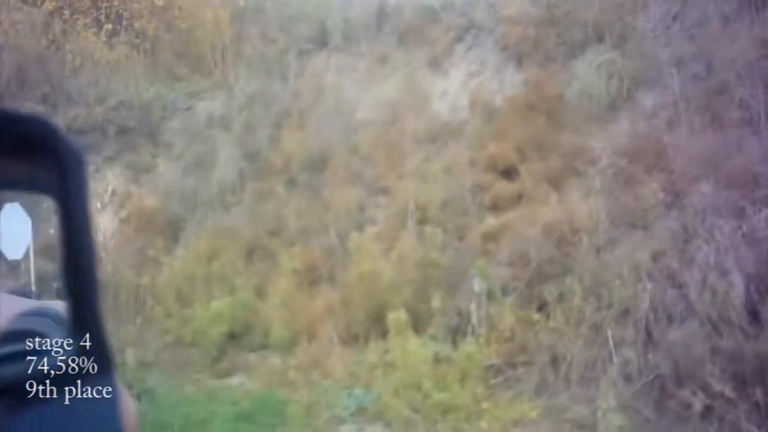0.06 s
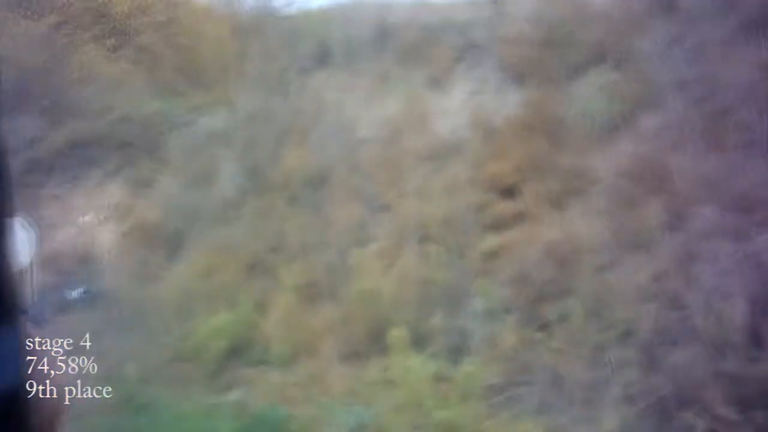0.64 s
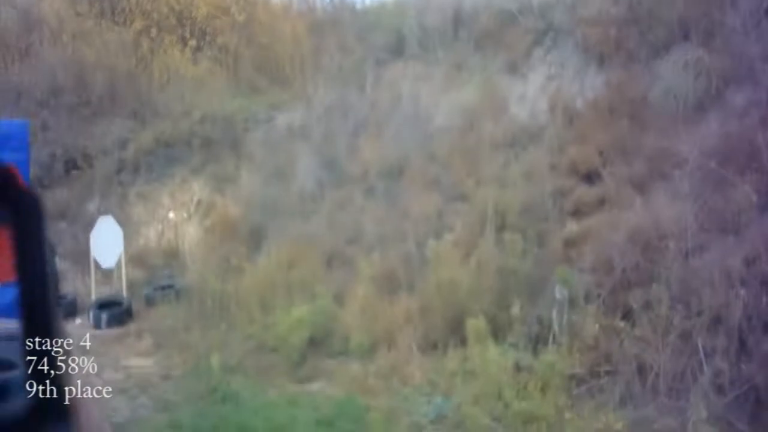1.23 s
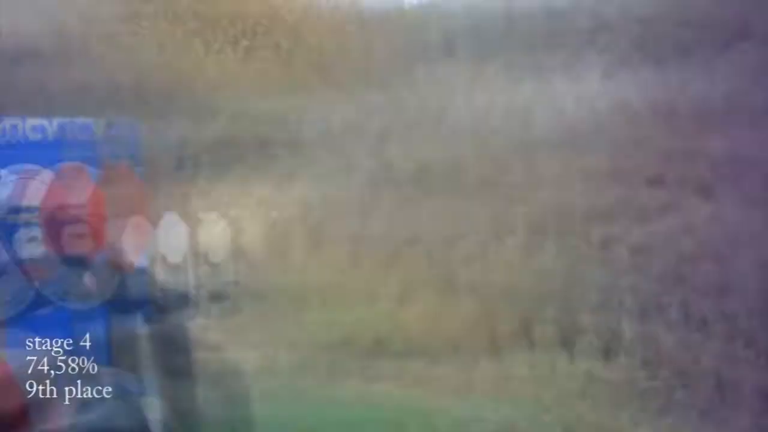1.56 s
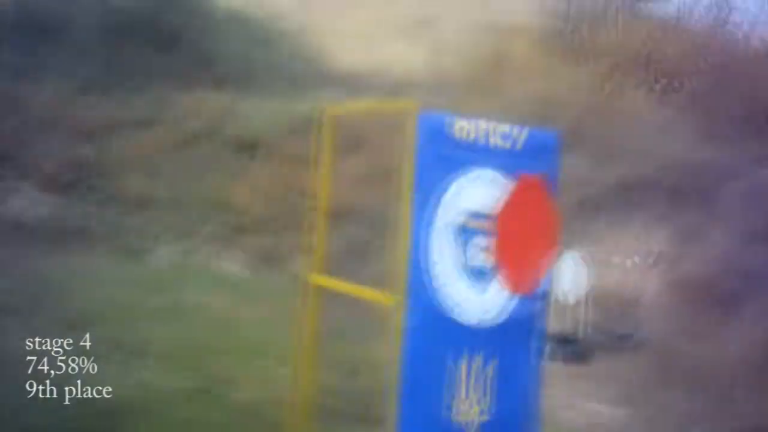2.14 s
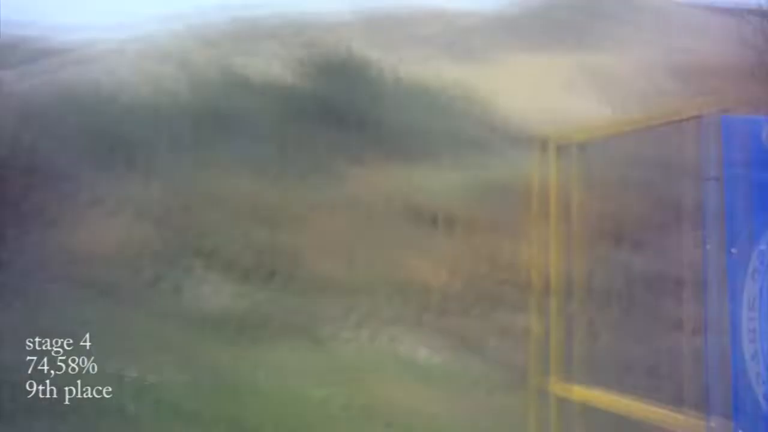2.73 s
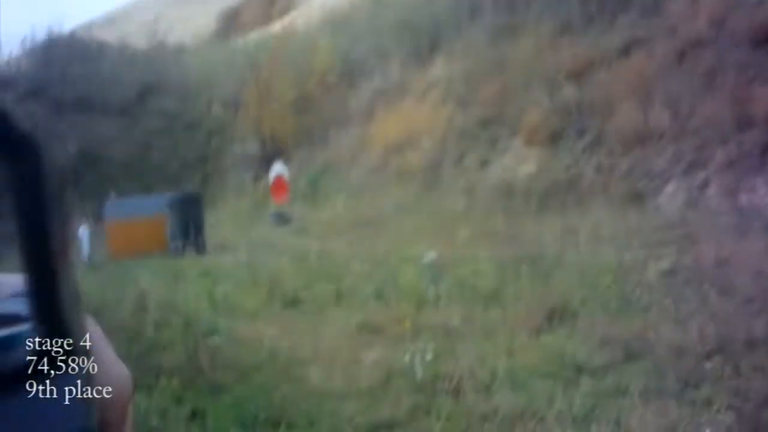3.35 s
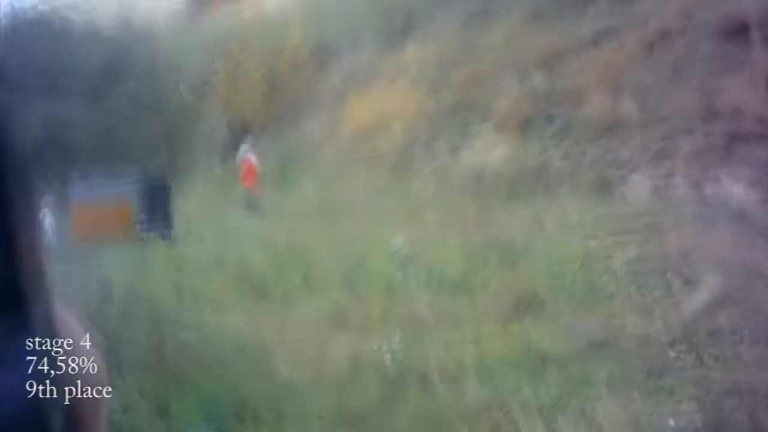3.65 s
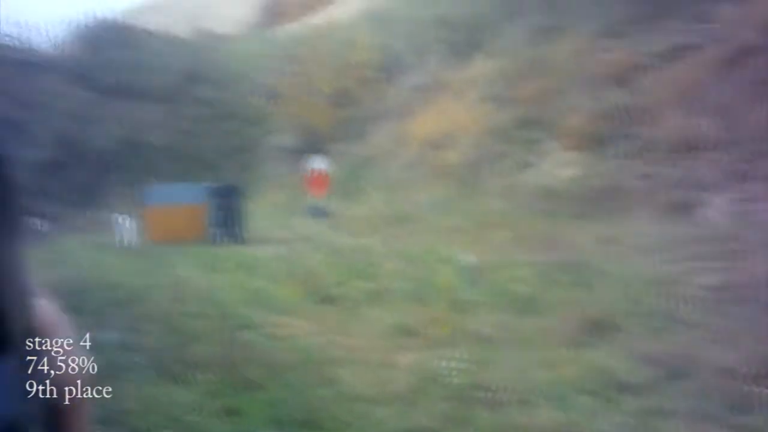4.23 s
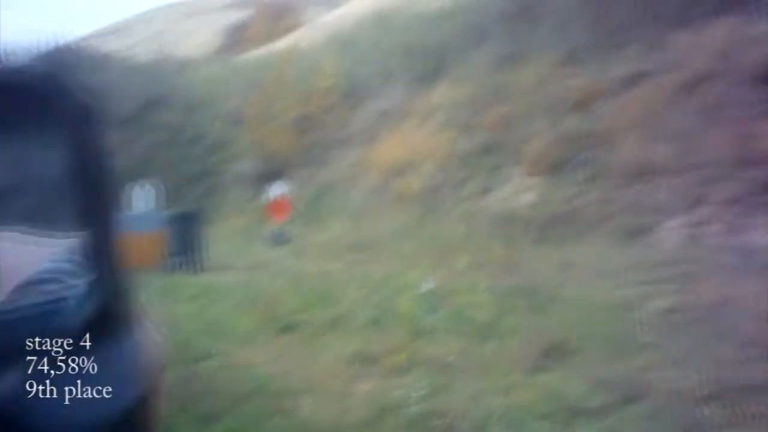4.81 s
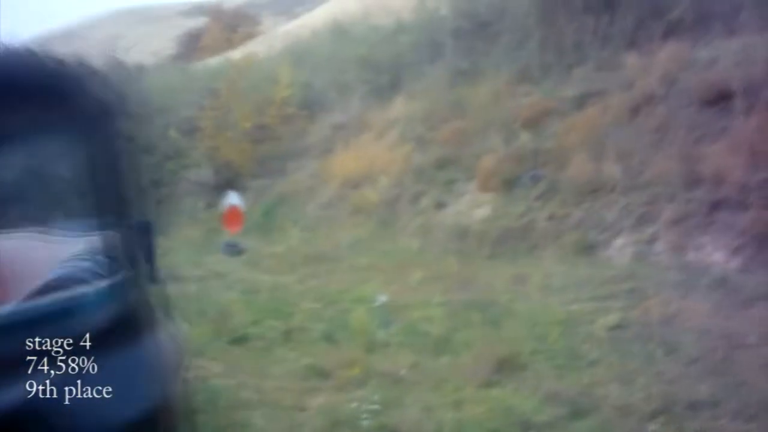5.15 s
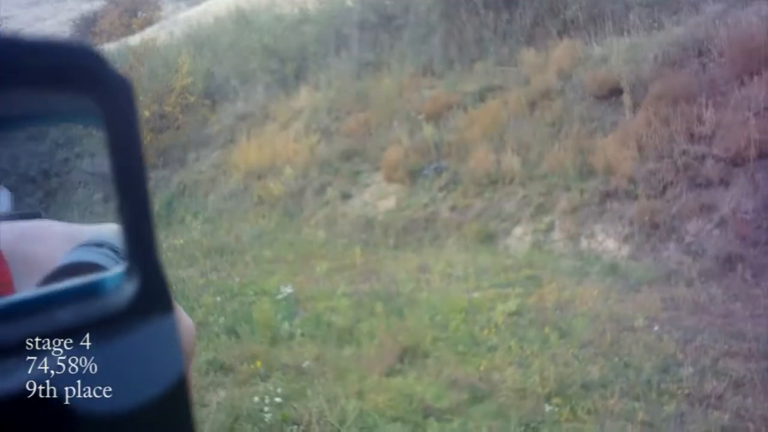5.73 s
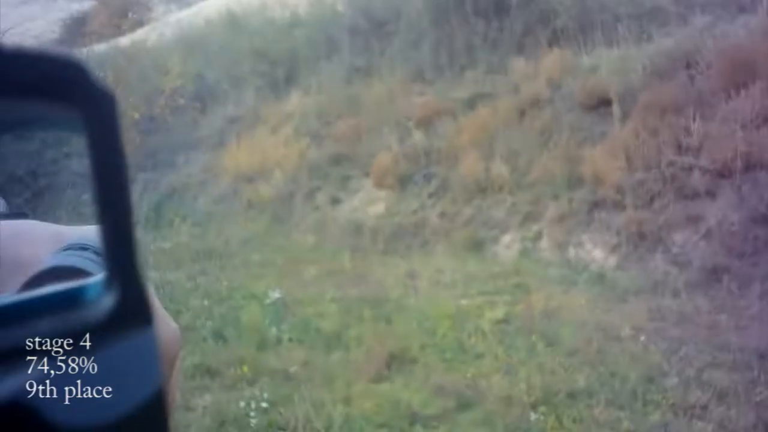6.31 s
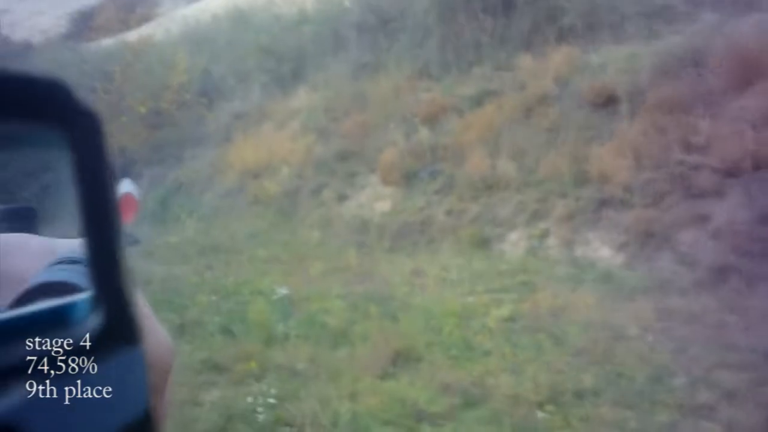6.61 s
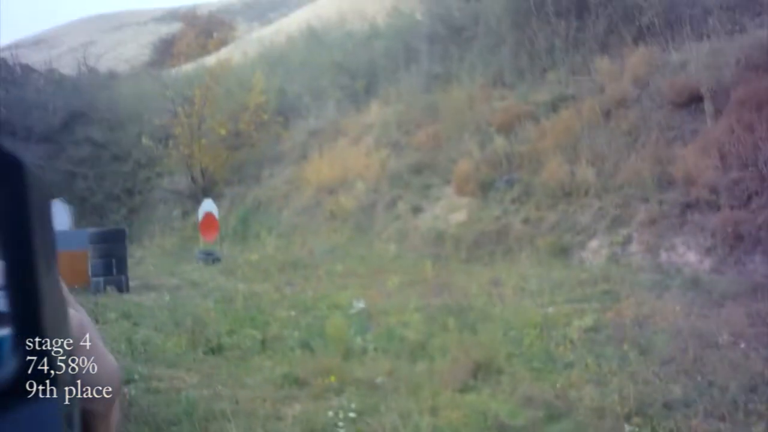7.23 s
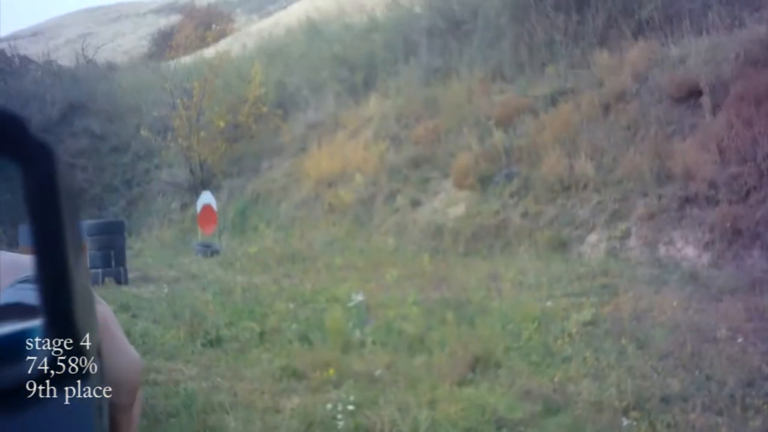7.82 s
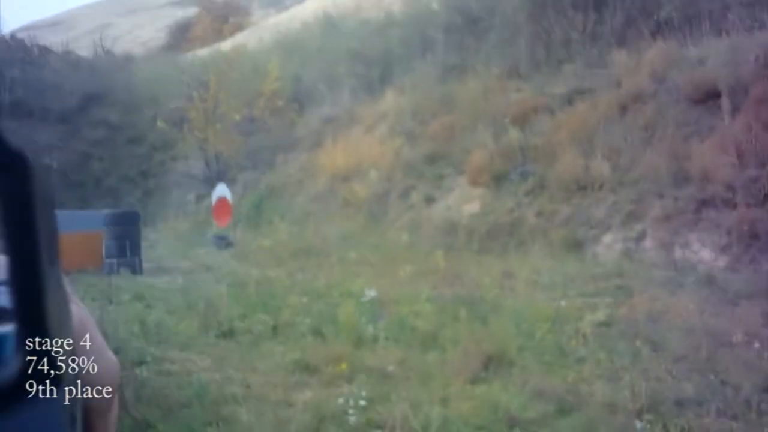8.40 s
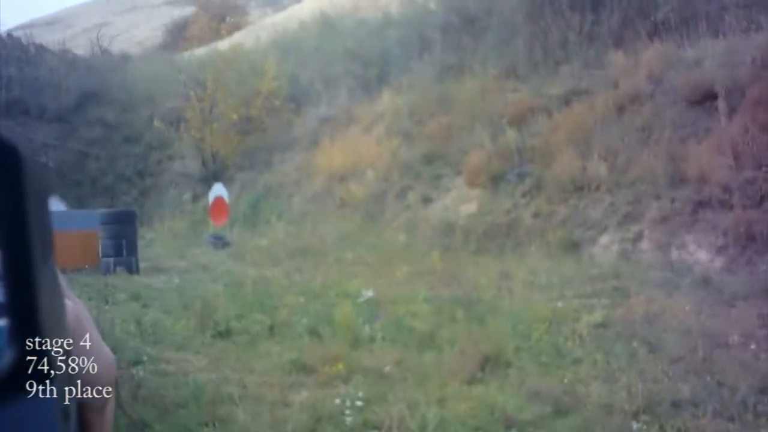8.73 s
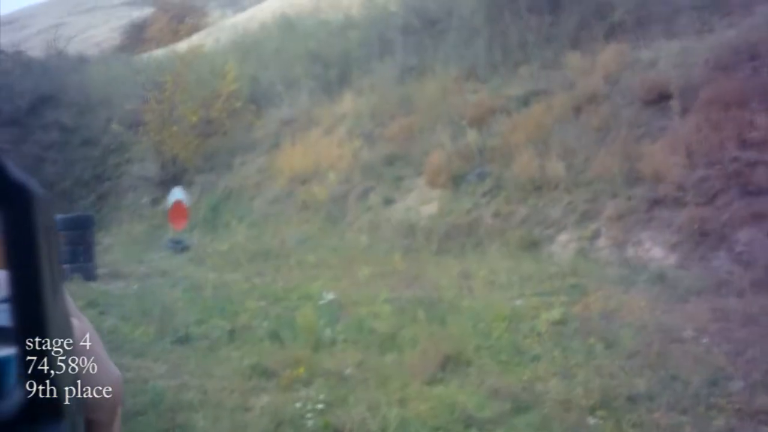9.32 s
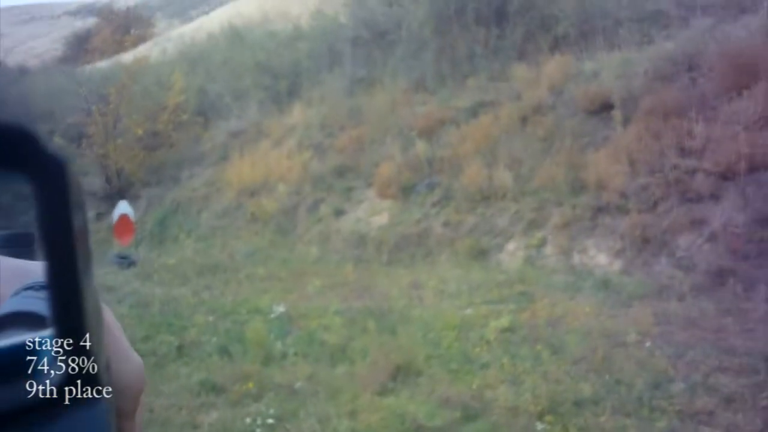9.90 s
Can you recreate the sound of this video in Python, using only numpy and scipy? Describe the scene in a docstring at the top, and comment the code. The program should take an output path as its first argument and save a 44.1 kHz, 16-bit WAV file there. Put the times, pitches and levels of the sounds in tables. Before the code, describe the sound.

Close, overloaded carbine shots echo around an outdoor range as bullets clang on steel and the shooter runs between positions.

```python
"""A carbine fires thirteen shots on an outdoor range, each burst of muzzle gas overloading a small camera.
The bolt slams shut after every shot, bullets smack downrange, and four steel plates ring and topple;
one throws a whizzing ricochet. Earth berms and far hills answer. Between the two strings the shooter
runs to a new position, with wind on the microphone, rustling cloth and loose gear."""
import sys
import numpy as np
from scipy import signal
from scipy.fft import rfft, irfft, next_fast_len
from scipy.io import wavfile
from scipy.ndimage import map_coordinates

SR = 44100
rng = np.random.default_rng(int(sys.argv[2]) if len(sys.argv) > 2 else 0)


def store_pcm(level_fs):
    """Save levels as 16-bit WAV."""
    pcm = np.round(np.clip(level_fs, -1, 1) * 32767).astype(np.int16)
    wavfile.write(sys.argv[1], SR, np.atleast_2d(pcm).T)


N = 439236

# shots, in relative levels: t/s, blast/dB, side wall echo/dB, pressure push/dB
SHOTS = [(.154, -1, -10, -19), (.5132, 1, -1.5, -20.5), (.6676, -1, -4, -21.5), (0.8455, 1.5, -8.5, -23),
         (1.3222, -0.5, 4.5, -23), (3.5916, 0.5, -27, -7), (3.9176, 4, -14.5, -9.5),
         (4.5499, 3.5, -15.5, -11.5), (5.8515, -1.5, -35, -10.5), (6.4166, 2.5, -26, -9.5),
         (7.36, -.5, -39, -9), (8.0552, 3, -30.5, -20.5), (8.911, 0, -27.5, -2.5)]
# toppling plates: hit/s, edge-on/s, half turn/s, ring starts fading fast/s, shimmer/dB
PLATE_FALLS = [(0.228, 0.335, 0.3, 0.44, -51.5), (1.395, 1.498, .16, 1.633, -48.5),
               (4.016, 4.14, 0.3, 4.28, -43.5), (4.64, 4.747, 0.21, 4.843, -47.5)]


def amp(db):
    """Decibels to gain."""
    return 10 ** (np.asarray(db) / 20)


def unit(x):
    """Scale to rms 1."""
    return x / np.sqrt(np.mean(x ** 2) + 1e-20)


def along(points, hz):
    """Read (f/Hz, value) points on a log frequency axis."""
    f, values = np.transpose(points)
    return np.interp(np.log(hz + 1), np.log(f + 1), values)


def band(f, hz, octaves):
    """Gain of a bell centred on a pitch."""
    return (1 + (np.log2((f + 1) / hz) / octaves) ** 2) ** -2.


def colour(spectrum, f, peaks=()):
    """Gain of a spectrum with added peaks and dips."""
    bumps_db = sum(db / (1 + (2 * (f - hz) / width) ** 2) for hz, width, db in peaks)
    return amp(along(spectrum, f) + bumps_db)


def filtered(x, response):
    """Equalise x with a gain curve over frequency."""
    size = next_fast_len(len(x) + 4096)
    return irfft(rfft(x, size) * response(np.fft.rfftfreq(size, 1 / SR)), size)[:len(x)]


def noise(spectrum, size):
    """Noise of rms 1 with a given spectrum."""
    return unit(filtered(rng.standard_normal(size), lambda f: colour(spectrum, f)))


def wobble(rate, size=SR):
    """A smooth random curve, rate knots a second."""
    knots = rng.standard_normal(int(size * rate / SR) + 4)
    return map_coordinates(knots, [np.arange(size) * rate / SR])


def decay(t, t60):
    """Silent before zero, then dying by 60 dB in t60 seconds."""
    return (t >= 0) * np.exp(-np.log(1000) * np.maximum(t, 0) / t60)


def add(track, s, sound):
    """Mix a sound into the track at s seconds."""
    start = max(round(s * SR), 0)
    part = track[start:start + len(sound)]
    part += sound[:len(part)]


def click(t, hz, t60, octaves):
    """A short noise burst of peak 1 centred on a pitch."""
    burst = filtered(rng.standard_normal(len(t)), lambda f: band(f, hz, octaves))
    burst = burst * decay(t, t60) * (1 - np.exp(-t / 0.00024))
    return burst / np.abs(burst).max()


def outdoor_air():
    """A faint, low bed of air that slowly drifts in level."""
    # air spectrum: f/Hz, level/dB
    spectrum = [(15, -40.5), (25, -6.5), (102, -5), (134, -3.5), (153, -8.5), (190, -6), (212, -7.5),
                (3520, -32.5), (9070, -38), (12900, -30), (16000, -34.5)]
    return amp(-64 + 0.76 * wobble(rate=0.78, size=N)) * noise(spectrum, N)


def puff(t, t60):
    """A burst of muzzle gas: nearly the same colour every time, with a new turbulent waveform."""
    # blast spectrum: f/Hz, level/dB
    spectrum = [(18, -34), (30, -15), (499, -3.5), (760, -7.5), (1590, -8), (1910, -9), (2230, 0),
                (3140, -6.5), (4080, -5), (4780, -16), (6720, -12.5), (8300, -21.5), (9970, -34.5),
                (12000, -28.5), (16000, -33)]
    # peaks and dips in the blast's colour: f/Hz, width/Hz, gain/dB
    blast_peaks = [(240, 70, 6), (294, 41, -7), (396, 130, 2.5), (547, 66, -2.5), (707, 180, 6.5),
                   (2330, 610, 3.5), (3900, 460, 3.5)]
    f = np.fft.rfftfreq(len(t), 1 / SR)
    turbulence = np.angle(rfft(rng.standard_normal(len(t)) * decay(t, t60)))
    burst = irfft(colour(spectrum, f, blast_peaks) * np.exp(1j * turbulence), len(t))
    return unit(burst) * np.std(decay(t, t60)) * decay(t, 3 * t60) * (1 - np.exp(-t / 0.002))


def blasts():
    """Hammer tick, then the muzzle blast with its bounces off ground, shooter and side wall."""
    out, t = np.zeros(N), np.arange(SR // 6) / SR
    u = t / .014  # overpressure turns to suction at u = 1
    push = (1 - u) * np.exp(-u) * (1 - np.exp(-t / 0.0022))
    for s, blast_db, wall_db, push_db in SHOTS:
        add(out, s - .0065, amp(-16.5) * click(t, hz=2600, t60=0.042, octaves=1.3))  # hammer
        add(out, s, amp(blast_db + 16) * puff(t, t60=.022))
        add(out, s, amp(push_db) * push)
        add(out, s + .0085, amp(blast_db + 10) * puff(t, t60=.022))  # ground
        add(out, s + .0135, amp(blast_db + 1) * puff(t, t60=0.033))  # shooter
        wall_bounce = filtered(puff(t, t60=.05), lambda f: 1 / np.hypot(1, f / 3500))
        add(out, s + 0.024, amp(blast_db + wall_db + 7.5) * wall_bounce)
    return out


def terrain():
    """Each blast scatters off the near berms, lingers between them, then rolls back dull from the hills."""
    # spectrum of the near scatter: f/Hz, level/dB
    berm_spectrum = [(24, -38), (40, -5), (60, -15), (249, -13.5), (529, -14.5), (663, -13), (1180, -13.5),
                     (2260, -1.5), (2630, -5.5), (4130, -8), (4930, -16.5), (7170, -19), (11600, -23),
                     (14800, -32), (16000, -39.5)]
    # spectrum of the far echoes: f/Hz, level/dB
    hill_spectrum = [(120, -41.5), (200, -8.5), (377, -8.5), (675, -5), (873, -6), (1360, -5), (1480, -3.5),
                     (2090, -0.5), (2440, -2), (2850, -21.5), (4010, -16), (7430, -38), (12000, -45.5),
                     (15600, -69), (22000, -120)]
    # echoes off the hills: delay/s, spread/s, level/dB
    echoes = [(.3, 0.028, -51.5), (0.431, 0.036, -49), (.51, .02, -55), (0.688, .04, -52.5)]
    boom_spectrum = [(20, -1.5), (300, -7.5), (900, -3.5), (2500, -18.5)]  # f/Hz, level/dB
    out, t = np.zeros(N), np.arange(SR) / SR
    grass = amp(-26.5) * decay(t, t60=0.29)
    slope = amp(-39) * decay(np.maximum(t - .2, 0), t60=0.21)  # holds until its far edge is reached
    linger = amp(-52) * decay(t, t60=1.7)
    hills = sum(amp(db) * np.exp(-.5 * ((t - delay) / spread) ** 2) for delay, spread, db in echoes)
    for s, _, wall_db, _ in SHOTS:
        scatter = amp(wobble(rate=160))  # many separate reflectors
        bay = amp(-33.5 + .65 * wall_db) * decay(t, t60=1.3)  # bay reverb, strongest by the side wall
        near = (grass + slope + linger + bay) * noise(berm_spectrum, len(t))
        far = hills * noise(hill_spectrum, len(t))
        add(out, s, scatter * (near + far))
        add(out, s, amp(-20.5) * decay(t, t60=0.27) * noise(boom_spectrum, len(t)))
    return out


def bolt():
    """The bolt scrapes forward, slams home a twentieth of a second after each shot, and bounces once."""
    # spectrum of the action: f/Hz, level/dB
    spectrum = [(88, -47.5), (150, -21), (745, -10), (1340, -15), (2550, -2.5), (4080, -0.5), (4950, -13.5),
                (6020, 0.5), (6640, -12), (7470, -14), (8070, -14.5), (14500, -18), (16000, -28)]
    out, t = np.zeros(N), np.arange(SR // 6) / SR
    since_closed = t - .0213
    scrape = amp(-28.5) * np.exp(-np.abs(since_closed) / .016)
    slam = amp(0.5) * decay(since_closed, t60=0.015)
    bounce = amp(-19) * decay(since_closed - .005, t60=0.047)
    for s, *_ in SHOTS:
        add(out, s + .03, amp(-0.14) * (scrape + slam + bounce) * noise(spectrum, len(t)))
    return out


def bullets():
    """One bullet a shot lands on steel or earth with a dry smack."""
    # bullet hits: t/s, relative level/dB, f/Hz
    hits = [(0.2257, -0.5, 3170), (0.5841, -2.5, 3260), (.7367, -4, 3270), (0.9152, -3, 3160),
            (1.3953, -2.5, 2170), (3.765, -10.5, 2930), (4.0181, 2, 2340), (4.6377, -2, 2670),
            (5.9665, -4.5, 3170), (6.5377, -11.5, 3180), (7.493, -14, 2900), (8.156, -6, 3230),
            (9.0118, -6, 3460)]
    out, t = np.zeros(N), np.arange(SR // 8) / SR
    for s, db, hz in hits:
        add(out, s, amp(db + 2) * click(t, hz, t60=0.0037, octaves=1.1))
    return out


def partial(hz, t):
    """One mode of a swinging plate, unsteady in phase and strength."""
    phase = rng.uniform(0, 2 * np.pi) + 0.14 * wobble(rate=51)[:len(t)]
    return amp(2 * wobble(rate=32)) * np.sin(2 * np.pi * hz * t + phase)


def plates():
    """Struck plates topple: each mode fades edge-on and swells face-on, then the ring dies away faster."""
    # modes of the four plates: f/Hz, upright level/dB, tipped level/dB, lag of the edge-on null/s
    steel_a = [(1475, -35.5, -26.5, 0), (2638, -14.5, -21.5, -0.0073), (3526, -41, -63, 0),
               (3914, -20.5, -25, -0.015), (3930, -25, -31, 0), (5070, -50.5, -56, 0),
               (7273, -32, -54.5, 0.0062), (7650, -44.5, -49.5, 0), (9281, -51, -59.5, 0),
               (11810, -47.5, -60, 0.0045)]
    steel_b = [(1540.5, -28.5, -26.5, -0.0081), (2600, -38, -45, 0), (4073, -31, -32, -0.03),
               (4960, -47.5, -46.5, 0.0042), (5540, -50, -66.5, 0), (7640, -44, -47.5, 0.03),
               (9453, -54.5, -66.5, 0), (11800, -58, -76, 0), (12280, -65, -78.5, 0)]
    steel_c = [(2296, -20.5, -35.5, 0.079), (2877, -21.5, -45.5, 0.096), (3370, -23, -31.5, 0.0028),
               (3820, -25.5, -50, 0.0075), (6000, -46.5, -65, 0.00087), (6740, -48, -63.5, 0),
               (8050, -59, -78, 0.00021), (8710, -49.5, -75.5, 0), (11340, -56, -76.5, 0.0096),
               (12330, -53.5, -87, 0), (13210, -53, -85, 0.0038), (13590, -54, -82.5, 0.0018),
               (15150, -52, -85.5, 0)]
    steel_d = [(1142, -49, -47, 0), (1540, -42, -35.5, 0.017), (2690, -28, -27.5, 0.015),
               (3030, -35.5, -37.5, 0), (4100, -39, -46.5, 0), (5620, -38.5, -46.5, 0), (6460, -55, -66, 0),
               (8000, -54, -62.5, 0.012), (8940, -44, -72, 0), (9534, -56.5, -61, 0.0027)]
    # landings and bounces that stir the modes, per plate: t/s, level re upright/dB, brightest f/Hz
    landings = [
        [(1.218, -10, 3716)],
        [(1.898, 4, 3700), (1.996, -6.5, 3940)],
        [(4.425, -11, 3000), (4.512, -10, 2600)],
        [],
    ]
    out, t = np.zeros(N), np.arange(SR) / SR
    stir = decay(t, t60=.19) * (1 - np.exp(-t / .004))
    for modes, fall, bounces in zip((steel_a, steel_b, steel_c, steel_d), PLATE_FALLS, landings):
        hit, edge_on, half_turn, fade_from, _ = fall
        now = hit + t
        tipped = np.clip(t / (fade_from - hit), 0, 1) ** 0.94
        late_fade = decay(np.maximum(now - fade_from, 0), t60=0.45)
        for hz, upright_db, tipped_db, lag in modes:
            level = amp(upright_db + (tipped_db - upright_db) * tipped)
            facing = np.hypot(.14, 1.4 * np.sin(np.pi * (now - edge_on - lag) / half_turn))
            add(out, hit, level * facing * late_fade * partial(hz, t))
            for s, db, bright_hz in bounces:
                strength = amp(upright_db + db) * band(hz, bright_hz, octaves=0.8)
                add(out, s, strength * stir * partial(hz, t))
    return out


def shimmer(count=26):
    """A bullet on steel also wakes a crowd of short, high plate modes."""
    out, t = np.zeros(N), np.arange(SR // 2) / SR
    for hit, *_, shimmer_db in PLATE_FALLS:
        pitches = np.linspace(4600, 15000, count) + rng.uniform(-200, 270, count)
        for hz, db in zip(pitches, rng.normal(0, 2.6, count)):
            level = amp(shimmer_db + db) * np.sqrt(6000 / hz)
            add(out, hit, level * decay(t, t60=.36) * np.sin(2 * np.pi * hz * t))
    return out


def slapback():
    """Boards and barrels slap each shot back, at delays set by the firing position."""
    # slaps, one list per firing position: delay/s, relative level/dB, f/Hz, width/octaves
    slaps = [
        [(.0844, -7, 2480, .55), (.105, -17, 2200, .45), (.145, -20, 2700, .47)],
        [(.0906, -10, 2080, .21), (.1057, -15, 2000, .25)],
    ]
    moved_s = 2.5  # later shots come from the second position
    out, t = np.zeros(N), np.arange(SR // 8) / SR
    for s, *_ in SHOTS:
        for delay, db, hz, width in slaps[int(s > moved_s)]:
            slap = click(t, hz, t60=0.0025 / width, octaves=2 * width)  # narrow slaps ring longer
            add(out, s + delay, amp(db + 1) * slap)
    return out


def grit():
    """Six grains of thrown grit patter down after each shot."""
    out, t = np.zeros(N), np.arange(SR // 8) / SR
    for s, *_ in SHOTS:
        for lateness, softness, pitch in rng.random((6, 3)):
            grain = click(t, hz=1700 + 2000 * pitch, t60=0.0089, octaves=1)
            add(out, s + .065 + .13 * lateness, amp(-17.5 - 10 * softness) * grain)
    return out


def knocks():
    """Plates thud down, gear knocks and spent cases land: each a tick, a faint tail and a low body."""
    # knocks: t/s, relative level/dB, f/Hz, body re level/dB
    hits = [(1.217, -19.5, 2300, -18), (2.179, -34.5, 1530, -13), (2.455, -34.5, 2510, -13),
            (2.72, -13.5, 3200, -24), (2.763, -26, 1300, -18), (3.315, -45, 1870, -21),
            (3.462, -47.5, 1260, -25), (4.426, -21, 3380, -21), (4.512, -13.5, 1860, -4),
            (6.718, -28, 2320, -17), (7.933, -45.5, 2530, -6), (8.637, -32.5, 2530, -10),
            (8.695, -39, 2040, -10), (9.49, -41, 2860, -9), (9.616, -51, 1390, -14),
            (9.867, -52, 4070, -16.5)]
    out, t = np.zeros(N), np.arange(SR // 8) / SR
    for s, db, hz, body_db in hits:
        add(out, s, amp(db - 1.76) * click(t, hz, t60=0.022, octaves=0.75))
        add(out, s, amp(db - 17) * click(t, hz, t60=0.076, octaves=1))
        add(out, s, amp(db + body_db) * click(t, hz=550, t60=0.043, octaves=1.6))
    return out


def ricochet():
    """A tumbling fragment whizzes away from the second plate, falling in pitch."""
    out, t = np.zeros(N), np.arange(SR // 3) / SR
    hz = 3700 * np.exp(-t / 0.38) * (1 + 0.021 * wobble(rate=300)[:len(t)])
    swell = np.sin(np.pi * t / t[-1]) * decay(t, t60=1.2)
    add(out, 1.46, amp(-38) * swell * np.sin(2 * np.pi * np.cumsum(hz) / SR))
    return out


def running():
    """Wind buffets the microphone, clothing rustles and gear ticks with the pace, surging at each step."""
    # wind on the microphone, following the running pace: t/s, relative level/dB
    pace = [(1.86, -58), (2.186, -46.5), (2.262, -52.5), (2.364, -49), (2.66, -46), (2.722, -41),
            (2.944, -62.5), (2.976, -54), (3.28, -75.5), (3.45, -72.5)]
    # spectrum of the buffeting: f/Hz, level/dB
    wind_spectrum = [(15, -41), (25, -3), (144, -1.5), (366, -10.5), (407, -10.5), (494, -16), (900, -28),
                     (1170, -61), (1980, -120)]
    # spectrum of the clothing: f/Hz, level/dB
    cloth_spectrum = [(350, -24.5), (600, -1), (1550, -8.5), (2440, -5), (3210, -12.5), (3890, -10.5),
                      (7940, -29), (14900, -25.5), (16000, -24.5)]
    footfall_s, step_s, jolt_s = 2.18, 0.31, .03  # one footfall, step period, half length of a jolt
    t = np.arange(N) / SR
    times, wind_db = np.transpose(pace)
    pace_db = np.interp(t, times, wind_db, left=-160, right=-160)
    from_step = (t - footfall_s + step_s / 2) % step_s - step_s / 2
    jolt = np.exp(-.5 * (from_step / jolt_s) ** 2)
    gusts = amp(0.89 * wobble(rate=15, size=N))
    buffet = amp(pace_db + 2 * jolt + 2.9) * gusts * noise(wind_spectrum, N)
    crinkle = amp(2.5 * wobble(rate=30, size=N) + 2 * wobble(rate=500, size=N))
    rustle = crinkle * noise(cloth_spectrum, N)
    for when, softness, pitch in rng.random((26, 3)):
        tick = click(t[:SR // 20], hz=1500 + 3000 * pitch, t60=.02, octaves=1)
        add(rustle, times[0] + when * (times[-1] - times[0]), amp(20 - 10 * softness) * tick)
    rustle_db = -52 + 0.45 * (pace_db - wind_db.max()) + 5.5 * jolt
    return buffet + amp(rustle_db) * rustle


def gear_clack():
    """A metal part of the gear pings and knocks mid-stride."""
    out, t = np.zeros(N), np.arange(SR // 8) / SR
    add(out, 2.7205, amp(-8.5) * click(t, hz=3270, t60=0.0063, octaves=0.3))
    add(out, 2.732, amp(-25.5) * click(t, hz=740, t60=0.075, octaves=1.2))
    return out


def scene():
    """The whole range over faint outdoor air, in mono."""
    air = outdoor_air()
    gunfire = blasts() + bolt() + terrain()
    impacts = bullets() + slapback() + grit() + knocks()
    steel = plates() + shimmer() + ricochet()
    shooter = gear_clack() + running()
    return (air + gunfire + impacts + steel + shooter)[None]


def record(dry):
    """The input stage flattens the peaks; the camera drops the subsonics, dulls the top and cuts it off."""
    # microphone response: f/Hz, gain/dB
    microphone = [(20, -3), (7800, -0.5), (9200, -6.5), (16000, -9)]
    ceiling, top_hz = 0.69, 15900
    clipped = dry[0] / (1 + (dry[0] / ceiling) ** 8) ** (1 / 8)
    coupled = signal.lfilter(*signal.butter(1, 6, "highpass", fs=SR), clipped)
    return filtered(coupled, lambda f: colour(microphone, f) / np.hypot(1, (f / top_hz) ** 90))[None]


dry = scene()
out = record(dry)
store_pcm(out)
```